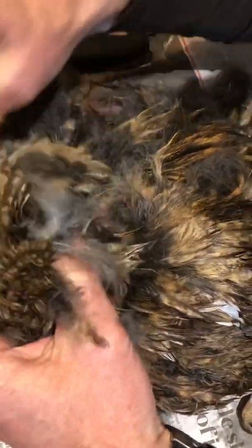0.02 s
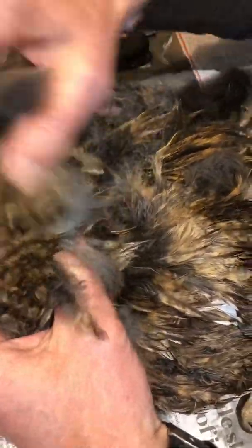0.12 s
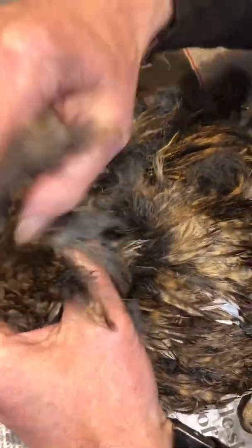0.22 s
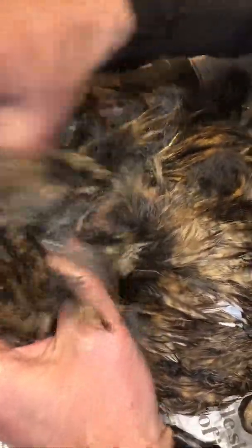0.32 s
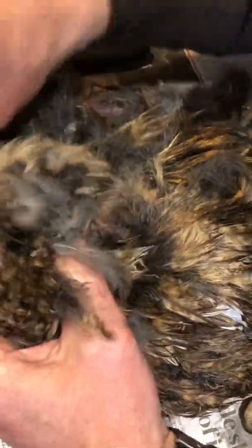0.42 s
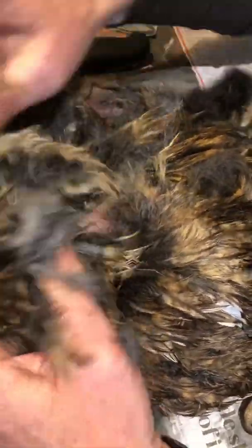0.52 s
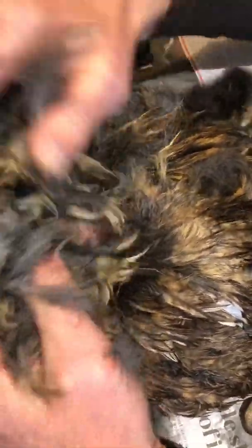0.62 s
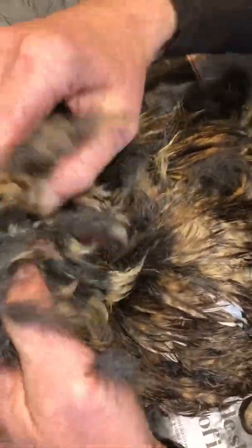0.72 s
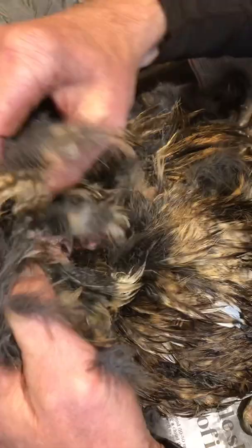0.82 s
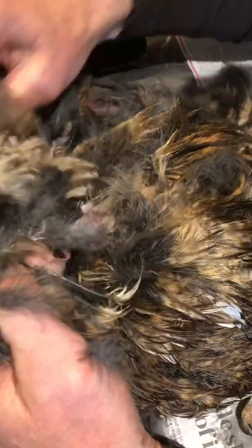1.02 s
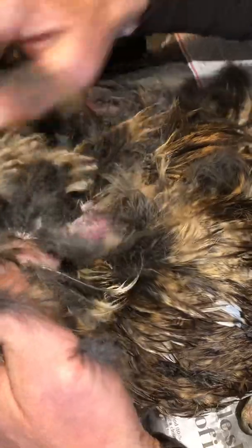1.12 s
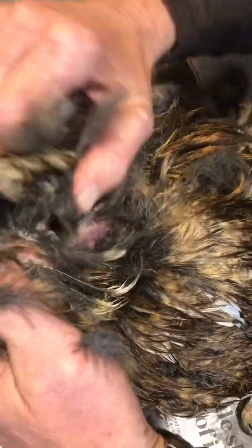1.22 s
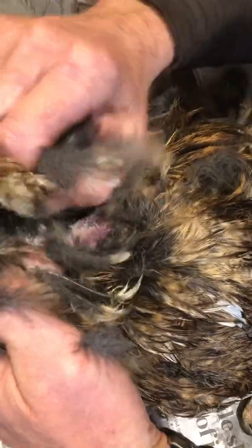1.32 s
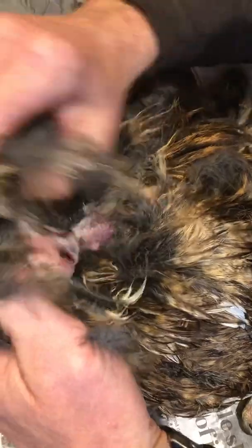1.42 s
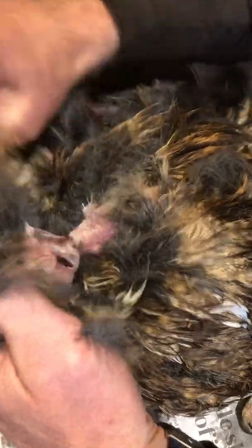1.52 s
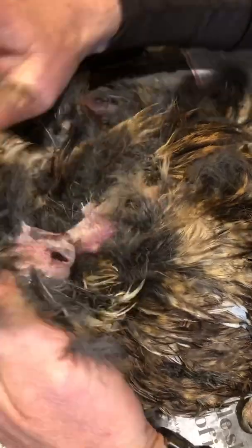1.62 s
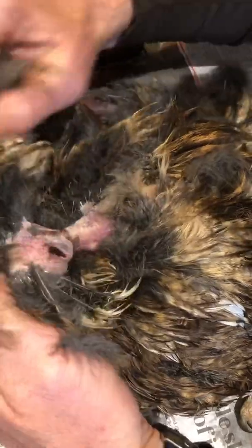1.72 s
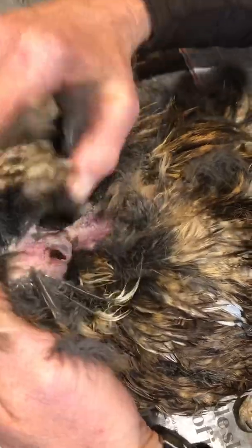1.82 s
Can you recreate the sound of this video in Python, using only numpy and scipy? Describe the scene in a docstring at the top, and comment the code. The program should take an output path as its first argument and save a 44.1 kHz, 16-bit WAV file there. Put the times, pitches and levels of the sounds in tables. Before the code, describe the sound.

Close feather plucking: a loud snappy tearing burst early, then quieter sparse ticks and soft rustles

```python
"""A quiet room's steady noise is heard first, with faint brushing down and skin rubbing on feathers,
all made of filtered noise. Then feathers are plucked by hand from a bird on a table, close by.
Quills pop out of the skin as short dying rings, and barbs tear as crowds of tiny random clicks.
The body drops on the table with dull thumps: low swings whose pitch sags.
Pops and tearing also bounce off hands, table and room."""
import sys
import numpy as np
from scipy import signal
from scipy.fft import rfft, irfft, next_fast_len
from scipy.io import wavfile
from scipy.ndimage import map_coordinates

SR = 44100
rng = np.random.default_rng(int(sys.argv[2]) if len(sys.argv) > 2 else 0)


def gain_from_decibels(decibels):
    """Convert decibel values to linear amplitude factors."""
    exponent = np.asarray(decibels, float) / 20
    return 10 ** exponent


def put_to_file(sound):
    """Save the sound as 16-bit audio at rate SR, in the file named by the first command-line argument."""
    columns = np.atleast_2d(sound).T  # one column per channel
    safe = np.clip(columns, -1, 1)
    whole_steps = np.round(safe * 32767)
    wavfile.write(sys.argv[1], SR, whole_steps.astype(np.int16))


N = 81585  # length in samples

# Tone of the quiet room: (f/Hz, relative level/dB)
FLOOR_TONE = [(10, -18), (22, -5.5), (37, 6), (55, -2), (80, -8), (150, -3), (300, -12), (600, -17.5),
              (1300, -21.5), (2000, -20), (3000, -27.5), (5000, -26.5), (7000, -31.5), (9000, -33),
              (12000, -40.5), (15000, -38.5), (16300, -40.5)]
# Down brushing past the fingers: (t/s, level/dB)
BRUSH_LEVEL = [(0, -70.5), (.05, -67), (.13, -67), (.15, -69), (.2, -69.5), (.25, -48.5), (.3, -63.5),
               (.35, -66.5), (.42, -64.5), (.445, -75.5), (.73, -88), (.76, -69), (.8, -61.5), (.835, -65),
               (.855, -77), (.91, -66.5), (.96, -75.5), (1.0, -73), (1.05, -71.5), (1.08, -75),
               (1.15, -68.5), (1.19, -77), (1.24, -69.5), (1.28, -81), (1.355, -73.5), (1.38, -59.5),
               (1.42, -60), (1.435, -86), (1.5, -63), (1.53, -77), (1.59, -69.5), (1.65, -80),
               (1.69, -72.5), (1.75, -75.5), (1.85, -90.5)]
# Tone of the brushing: (f/Hz, relative level/dB)
BRUSH_TONE = [(900, -53), (1500, -11.5), (3000, -10.5), (5000, -14.5), (7000, -3.5), (9000, -11),
              (12000, -14.5), (15000, -17), (16500, -8.5)]
# Fingers rubbing the body: (t/s, level/dB)
RUB_LEVEL = [(0, -83), (.2, -73), (.25, -53), (.3, -63.5), (.36, -74), (.46, -77.5), (.72, -74.5),
             (.8, -65), (.86, -64.5), (.92, -58), (1.0, -60), (1.06, -68), (1.15, -69), (1.35, -74),
             (1.39, -54), (1.43, -53.5), (1.47, -67.5), (1.55, -67), (1.62, -70), (1.69, -61),
             (1.75, -63.5), (1.85, -66)]
# Tone of the rubbing: (f/Hz, relative level per Hz/dB)
RUB_TONE = [(50, -29), (100, 1.5), (200, -3), (330, 1.5), (500, -8.5), (750, -3.5), (1200, -11),
            (2000, -13.5), (3000, -20.5), (5000, -35)]
# Moments when quills pop free: t/s
POP_TIMES = [.2097, .2151, .2198, .2217, .2233, .2284, .2309, .2330, .2343, .2376, .2457, .2481, .2598,
             .3900, .6380, .7822, 1.3090, 1.3587, 1.3706, 1.3872, 1.4115, 1.4250, 1.4755, 1.6165, 1.6228,
             1.6760, 1.6780, 1.7930, 1.7960]
# Voice of each pop, in the same order, before the modes and chance shift it:
# (deep ring level/dB, bright ring level/dB, airy edge level/dB, deep ring f/Hz, bright ring f/Hz)
POP_VOICES = [(-26, -23, -51.5, 1593, 4665), (-47.5, -24, -52.5, 2200, 4370), (-18, -16.5, -39, 2038, 4306),
              (-27.5, -24.5, -38.5, 1843, 4620), (-33, -21, -31.5, 1570, 4900),
              (-30.5, -19, -38, 1920, 4000), (-36.5, -23, -35, 1680, 4625), (-25, -27, -45, 1544, 5044),
              (-24, -20.5, -46.5, 2270, 4393), (-19.5, -31, -45, 2610, 4160), (-25.5, -30, -24, 1768, 5600),
              (-26.5, -26, -19.5, 994, 5700), (-43, -44.5, -33.5, 1950, 4500),
              (-48, -60.5, -72, 1400, 4500), (-54.5, -52.5, -68, 1800, 4000), (-33, -46, -66.5, 2211, 4800),
              (-62, -50.5, -57.5, 1500, 4920), (-40.5, -40, -50.5, 1865, 4003),
              (-30, -35.5, -50, 1970, 4340), (-31.5, -43.5, -58, 1180, 5360), (-26.5, -31, -48, 1301, 4676),
              (-45.5, -56, -61, 1930, 4500), (-45.5, -48, -66, 1460, 5140), (-61.5, -48.5, -54, 1230, 5870),
              (-56.5, -46, -62.5, 1700, 5200), (-41, -49, -72, 1620, 2870), (-49, -68, -72.5, 694, 3800),
              (-48, -52.5, -66.5, 2000, 3320), (-46.5, -66, -74, 476, 3500)]
# Modes that make up the deep ring: (pitch ratio, level added/dB)
DEEP_RING_MODES = [(.82, -8.5), (1.04, 1), (1.2, -17.5)]
# Modes that make up the bright ring: (pitch ratio, level added/dB)
BRIGHT_RING_MODES = [(.88, -1.5), (1.02, 3), (1.25, -1.5), (1.8, -10)]
# Tearing barbs, one curve a tug: (t/s, bright level/dB, deep level/dB)
TEAR_LEVELS = [
    [(.21, -63.5, -56.5), (.225, -49.5, -52.5), (.243, -45.5, -45), (.247, -48, -38.5), (.252, -47, -41.5),
     (.262, -52, -51), (.3, -58, -59.5), (.34, -65, -66), (.42, -68, -69), (.445, -76.5, -74.5)],
    [(.63, -76.5, -71.5), (.64, -67, -71.5), (.655, -79.5, -76.5)],
    [(.742, -75.5, -77.5), (.775, -69.5, -70.5), (.788, -56, -66.5), (.797, -50.5, -65), (.799, -74, -55.5),
     (.804, -53, -56.5), (.812, -66, -59.5), (.83, -70, -74), (.85, -73, -79.5)],
    [(.87, -73, -77), (.92, -69.5, -67.5), (1.0, -73.5, -74), (1.07, -78.5, -74)],
    [(1.357, -67, -70), (1.368, -64, -68), (1.373, -58, -51), (1.383, -62, -51.5), (1.392, -57.5, -54.5),
     (1.408, -61.5, -63.5), (1.418, -62.5, -55), (1.43, -67.5, -58.5), (1.47, -68.5, -66.5),
     (1.5, -71.5, -69), (1.53, -78, -70)],
    [(1.676, -74, -66.5), (1.686, -70, -61.5), (1.695, -73.5, -72.5), (1.72, -77, -78)],
    [(1.79, -80, -70), (1.794, -67, -59), (1.799, -84, -71.5)],
]
# Tone of the bright tearing: (f/Hz, relative level per Hz/dB)
TEAR_BRIGHT_TONE = [(2500, -28.5), (3400, -2.5), (4300, 1.5), (6000, -3), (7000, -12), (9000, -10.5),
                    (13000, -19), (16500, -29.5)]
# Tone of the deep tearing: (f/Hz, relative level per Hz/dB)
TEAR_DEEP_TONE = [(200, -46.5), (350, -2.5), (700, -7), (1200, -3), (1600, 1.5), (2200, 0.5), (2800, -11.5),
                  (3600, -50)]
# How long the room takes to fade by 60 dB: (f/Hz, fade time/s)
ROOM_FADE = [(300, 0.324), (2000, 0.346), (6000, 0.246), (14000, 0.238)]
# The body drops on the table: (t/s, level before the swell/dB, start f/Hz, settled f/Hz, time to fall 60 dB/s)
THUMP_DROPS = [(0.277, -43, 77.6, 44.3, 0.173), (0.353, -50, 42.3, 35.7, 0.81),
               (0.835, -43.5, 48.2, 36.7, 0.234), (1.43, -44, 53.4, 37, 0.266),
               (1.439, -59.5, 120, 111, 0.13), (0.428, -59.5, 151.4, 140, 0.092),
               (1.587, -49.5, 130, 120, .1), (1.615, -39.5, 140.7, 132.7, 0.0917),
               (1.685, -49, 147.2, 141.2, .1), (1.719, -51.5, 130.4, 120, 0.195)]


def unit(x):
    """Scales a sound to an rms of one."""
    return x / np.sqrt(np.mean(x ** 2) + 1e-20)


def along(points, hz):
    """Reads a curve of (f/Hz, value) points on a log pitch axis."""
    f, v = np.transpose(points)
    return np.interp(np.log(hz + 1), np.log(f + 1), v)


def level(rows, column=1):
    """Gain per sample from one dB column of rows that start with t/s; silent outside them."""
    columns = np.transpose(rows)
    return gain_from_decibels(np.interp(np.arange(N) / SR, columns[0], columns[column], left=-150, right=-150))


def wobble(rate):
    """A smooth random curve through `rate` random points a second."""
    points = rng.standard_normal(int(N * rate / SR) + 4)
    return map_coordinates(points, [np.arange(N) * rate / SR])


def filtered(x, response):
    """Multiplies the spectrum of x by a response that depends on frequency."""
    size = next_fast_len(N + 8192)  # spare room so the end does not wrap onto the start
    return irfft(rfft(x, size) * response(np.fft.rfftfreq(size, 1 / SR)), size)[:N]


def coloured(x, tone):
    """Gives x the tone of a table, at an rms of one."""
    return unit(filtered(x, lambda hz: gain_from_decibels(along(tone, hz))))


def add(out, start_s, sound):
    """Mixes a sound into out from start_s on, cut off at the end of out."""
    part = out[max(round(start_s * SR), 0):][:len(sound)]
    part += sound[:len(part)]


def room_noise():
    """The quiet room: steady random noise with a fixed tone."""
    return gain_from_decibels(-63) * coloured(rng.standard_normal(N), FLOOR_TONE)


def brushing():
    """Soft hiss of down: noise that flickers a little."""
    flicker = gain_from_decibels(0.86 * wobble(120))
    return coloured(rng.standard_normal(N) * flicker, BRUSH_TONE) * level(BRUSH_LEVEL)


def rubbing():
    """Skin on feathers: dull noise that flickers more slowly."""
    flicker = gain_from_decibels(1.41 * wobble(59.78))
    return coloured(rng.standard_normal(N) * flicker, RUB_TONE) * level(RUB_LEVEL)


def ring(t, hz, db, t60):
    """One mode of a pop: a sine with a very fast attack that falls 60 dB in t60 seconds."""
    attack = 1 - np.exp(-t / .00016)
    return -gain_from_decibels(db - 60 * t / t60) * np.sin(2 * np.pi * hz * t) * attack


def pops():
    """Each quill snaps free: a deep and a bright short ring, an airy edge and a small thud."""
    deep_t60_s, bright_t60_s, edge_t60_s, thud_t60_s = .006, .004, .003, .008
    thud_hz, thud_db = 814, -12.5  # middle pitch; level next to the deep ring
    out = np.zeros(N)
    t = np.arange(SR // 40) / SR
    band = signal.butter(2, (5700, 16100), "band", fs=SR)
    edges = signal.lfilter(*band, rng.standard_normal((len(POP_VOICES), len(t))))
    chances = rng.standard_normal((len(POP_VOICES), 16))
    for start_s, voice, chance, edge in zip(POP_TIMES, POP_VOICES, chances, edges):
        deep_db, bright_db, edge_db, deep_hz, bright_hz = voice
        sound = ring(t, thud_hz * (1 + 0.102 * chance[0]), deep_db + thud_db, thud_t60_s)
        sound = sound + gain_from_decibels(edge_db - 60 * t / edge_t60_s) * edge
        modes = [(deep_hz * ratio, deep_db + db, deep_t60_s) for ratio, db in DEEP_RING_MODES]
        modes += [(bright_hz * ratio, bright_db + db, bright_t60_s) for ratio, db in BRIGHT_RING_MODES]
        for k, (hz, db, t60) in enumerate(modes):
            # chance moves each mode a little in pitch and level
            sound = sound + ring(t, hz * (1 + .02 * chance[1 + k]), db + 1.2 * chance[8 + k], t60)
        add(out, start_s, sound)
    return out


def table(x):
    """The table's bounce cancels a band near 3 kHz, and small sources carry no bass."""
    dip_hz, dip_width_hz, dip_db, low_edge_hz = 2850, 800, -8, 320

    def response(f):
        width = 1j * f * dip_width_hz
        resonance = dip_hz ** 2 - f * f
        dip = (resonance + gain_from_decibels(dip_db) * width) / (resonance + width)
        bass_cut = (1j * f / (low_edge_hz + 1j * f)) ** 2
        return dip * bass_cut
    return filtered(x, response)


def tearing():
    """Barbs tear in dense, clumped tiny snaps of uneven size, in a bright and a deep band."""
    grains_per_s, spread_db = 14000, 2
    hit = rng.random(N) < grains_per_s / SR
    uneven_db = spread_db * rng.standard_normal(N)
    clumps_db = 1.6 * wobble(300)
    grains = hit * rng.standard_normal(N) * gain_from_decibels(uneven_db + clumps_db)
    bright_level = sum(level(rows, column=1) for rows in TEAR_LEVELS)
    deep_level = sum(level(rows, column=2) for rows in TEAR_LEVELS)
    bright = coloured(grains, TEAR_BRIGHT_TONE) * bright_level
    return bright + coloured(grains, TEAR_DEEP_TONE) * deep_level


def room(x):
    """Close scatter off hands and table, then a tail whose fade time depends on pitch."""
    room_db, near_db, near_t60_s = -14, -9, .025
    hz, t, noise = signal.stft(rng.standard_normal(SR // 2), SR, nperseg=256)
    fade = gain_from_decibels(-60 * t / along(ROOM_FADE, hz)[:, None])
    tail = signal.istft(noise * fade, SR, nperseg=256)[1]
    near_t = np.arange(SR // 20) / SR
    near = rng.standard_normal(SR // 20) * gain_from_decibels(-60 * near_t / near_t60_s)
    # the tail waits 200 samples, the scatter only 1.2 ms
    echo = gain_from_decibels(room_db) * np.pad(tail / np.linalg.norm(tail), (200, 0))
    add(echo, .0012, gain_from_decibels(near_db) * near / np.linalg.norm(near))
    return signal.fftconvolve(x, echo)[:N]


def thumps():
    """The body drops on the table: soft low swings whose pitch sags as they settle."""
    sag_s, swell_s = 0.0205, 0.0113  # time constants
    out = np.zeros(N)
    t = np.arange(SR // 2) / SR
    for start_s, db, start_hz, end_hz, t60 in THUMP_DROPS:
        hz = end_hz + (start_hz - end_hz) * np.exp(-t / sag_s)
        swing = np.sin(2 * np.pi * np.cumsum(hz) / SR)
        swell = 1 - np.exp(-t / swell_s)
        add(out, start_s, gain_from_decibels(db - 60 * t / t60) * swell * swing)
    return out


def scene():
    """Mixes all layers; only the pops and the tearing are sent through the room."""
    plucks = table(pops()) + tearing()
    mix = room_noise() + brushing() + rubbing() + plucks + room(plucks) + thumps()
    return mix[None]  # one channel


def top_cut(x):
    """Nothing passes above the cut-off."""
    return signal.sosfilt(signal.butter(12, 16470, fs=SR, output="sos"), x)


def record(dry):
    """Takes off the highest treble with a smooth, steep slope."""
    top_hz, slope_hz = 15560, 120
    mix = filtered(dry[0], lambda hz: 1 / (1 + np.exp((hz - top_hz) / slope_hz)))[None]
    return top_cut(mix)


dry = scene()
out = record(dry)
put_to_file(out)
```